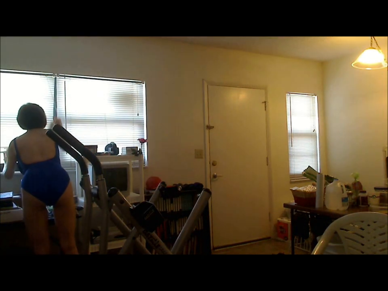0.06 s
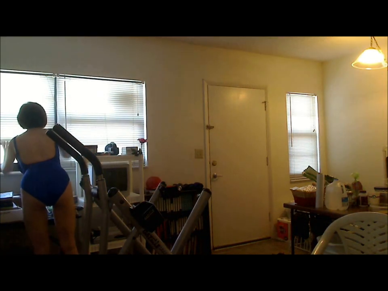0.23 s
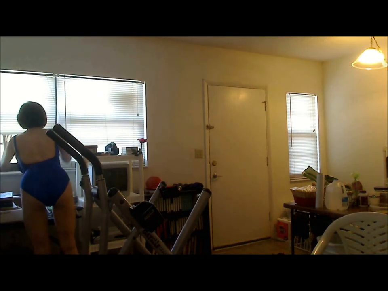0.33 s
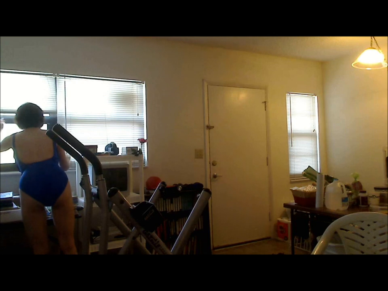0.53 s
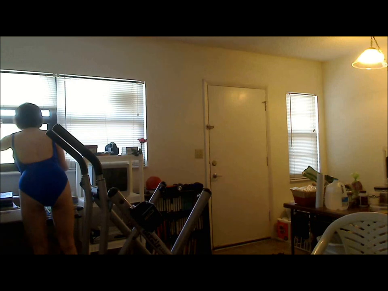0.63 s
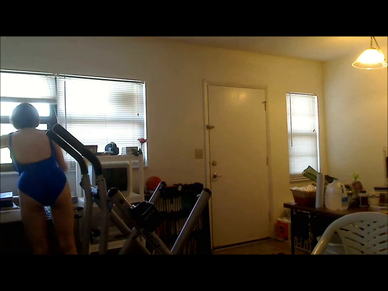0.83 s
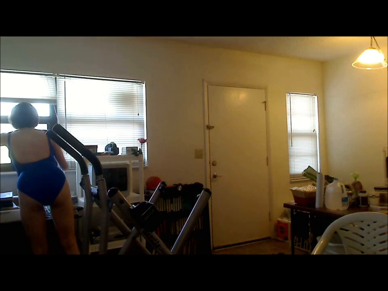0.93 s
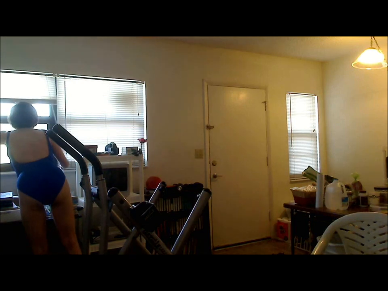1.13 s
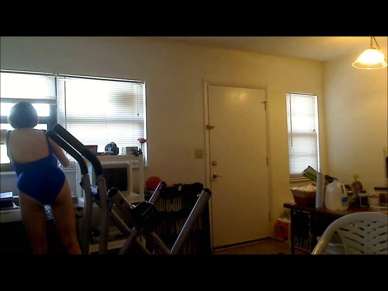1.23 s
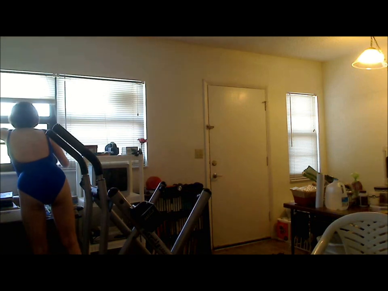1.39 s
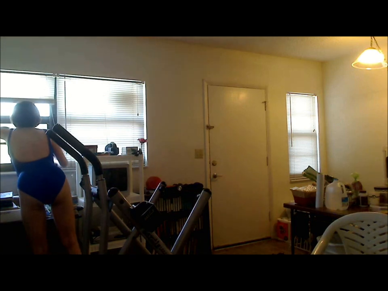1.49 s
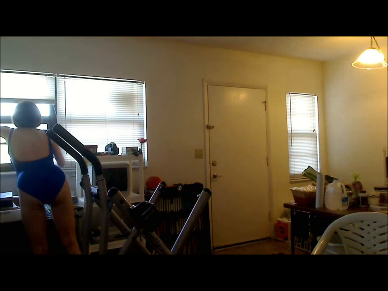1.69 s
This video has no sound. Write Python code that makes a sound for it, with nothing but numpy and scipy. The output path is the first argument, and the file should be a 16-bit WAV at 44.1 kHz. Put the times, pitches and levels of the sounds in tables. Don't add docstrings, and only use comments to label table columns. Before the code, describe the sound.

A horizontal blind rises in one quick pull, dry raspy clatter swelling and thinning, followed by soft hand brushing and sparse slat ticks over very faint hum; short room echo, modest camera microphone with dulled top treble.

```python
import sys
import numpy as np
from scipy import signal
from scipy.fft import rfft, irfft, next_fast_len
from scipy.io import wavfile
from scipy.ndimage import uniform_filter1d, map_coordinates

SR = 44100
rng = np.random.default_rng(int(sys.argv[2]) if len(sys.argv) > 2 else 0)


def gain_from_db(level_db):
    decades = np.asarray(level_db, float) / 20
    return 10 ** decades


def dump(signal):
    limited = np.clip(np.atleast_2d(signal).T, -1, 1)
    pcm = np.round(limited * 32767).astype(np.int16)
    wavfile.write(sys.argv[1], SR, pcm)


N = 77175
T = np.arange(N) / SR

# (multiple of the fundamental, level [dB rms])
HUM_LINES = [(1, -73), (2, -80), (3, -73.5), (4, -90)]
# (frequency [Hz], density [dB per Hz])
AIR_SPECTRUM = [(20, -5.5), (120, 13.5), (250, 5), (330, 6), (600, 0), (1400, -10.5), (5000, -14.5),
                (15700, -20.5)]
# (time [s], level [dB])
HAND_STROKES = [
    [(0, -81.5), (.04, -66.5), (.055, -62.5), (.11, -58.5), (.14, -56), (.2, -60), (.26, -84.5)],
    [(.76, -87), (.84, -56), (.885, -62.5), (.926, -70), (.93, -57.5), (.968, -59), (.978, -95),
     (1.01, -103), (1.04, -92.5)],
]
# (frequency [Hz], density [dB per Hz])
HAND_SPECTRA = [
    [(700, -32), (1100, -16.5), (2300, -3), (3300, 1), (4100, -10), (6000, -15), (7800, -39.5),
     (11500, -19), (15700, -39)],
    [(700, -30.5), (1100, 2.5), (2800, 3), (7000, -12), (8000, -27), (15700, -42)],
]
# (time [s], level [dB], ring pitch [Hz], crack [dB], rattle [s])
SLAT_TICKS = [(.003, -81.5, 9500, -6, 0.012), (.02, -75, 4900, -21, 0.022), (.972, -71.5, 1490, -25, 0.015),
              (1.123, -72.5, 3690, 0, 0.012), (1.125, -76.5, 2770, -10, 0.029),
              (1.123, -76, 1280, -17, 0.038), (1.148, -71.5, 1995, -34, 0.016),
              (1.18, -83.5, 2420, -11, 0.035), (1.208, -85, 1440, 1, .01), (1.235, -88.5, 2167, -2, 0.051),
              (1.395, -90.5, 9500, 2, .015), (1.507, -77.5, 4800, 3, 0.017),
              (1.507, -91.5, 2220, -25, 0.021), (1.564, -79.5, 2267, -4, 0.006),
              (1.571, -80, 2710, -10.5, 0.0077), (1.579, -81, 3206, -8.5, 0.013),
              (1.587, -89, 4500, 0.5, .012), (1.594, -83, 1640, -10, 0.017)]
# (frequency [Hz], density [dB per Hz])
CRACK_SPECTRUM = [(1500, -17), (3390, -10), (6430, -8.5), (10500, -6.5), (13000, -10.5), (15700, -21.5)]
# (frequency [Hz], decay by 60 dB [s])
ROOM_T60 = [(300, 0.26), (2000, 0.18), (10000, 0.21)]
# (time [s], level [dB], strongest pitch [Hz], free ringing [s])
RAIL_KNOCKS = [(0.046, -57, 240, 0.067), (.14, -62, 402, 0.045), (.141, -54, 720, 0.006),
               (.175, -56, 420, 0.063), (.24, -58, 970, 0.055), (0.318, -47.5, 1120, 0.0088),
               (.316, -45, 1390, 0.0066), (.317, -42.5, 566, 0.0074), (.355, -50, 419, .05),
               (.424, -52, 950, 0.0098), (0.701, -53, 950, 0.0051), (.292, -46.5, 420, 0.075),
               (.445, -56.5, 428, 0.031), (0.518, -43, 626, 0.0061), (.546, -43, 623, 0.0043),
               (.577, -45.5, 614, 0.0096), (.662, -47.5, 640, 0.0081), (.696, -47, 616, 0.0049),
               (.752, -49, 596, 0.082), (.927, -51.5, 581, 0.031), (.961, -53.5, 608, 0.011),
               (.976, -60.5, 584, 0.031), (1.126, -64, 651, 0.052), (1.14, -61.5, 230, 0.021),
               (1.17, -68.5, 300, .02), (1.58, -82.5, 660, .05), (1.633, -65, 350, 0.028),
               (1.659, -71, 301, 0.03)]
# (frequency [Hz], level [dB])
RAIL_MODES = [(240, -4), (300, -5.5), (370, -7.5), (412, -1.5), (505, 0.5), (555, -6.5), (595, -4.5),
              (630, 0), (670, -5), (720, -7), (780, 3.5), (960, 2), (1140, 6.5), (1350, 4)]
# (time [s], rasp level [dB], treble [dB])
CORD_PULL = [(0, -92, 0), (0.109, -67, 6), (0.137, -50.5, 5.5), (.16, -52, 2), (0.233, -49.5, 0),
             (0.249, -44.5, 4.5), (0.3, -41.5, 2.5), (0.321, -37, 0.5), (.42, -39.5, 2), (.55, -39, 2.5),
             (.69, -42.5, 0), (.74, -44, -0.5), (.82, -47.5, -1), (0.879, -54, -1), (0.913, -62, -9),
             (.926, -66, -16), (0.966, -85, -23), (.985, -99, -24)]
# (frequency [Hz], density [dB per Hz])
RASP_SPECTRUM = [(260, -51.5), (330, -20.5), (410, -5.5), (1370, -7), (4000, -3.5), (6200, -6.5),
                 (7000, -9), (12500, -14.5), (15700, -24.5)]
# (frequency [Hz], width [Hz], level [dB])
SLAT_MODES = [(985, 100, -3), (1928, 460, -8), (5353, 1000, -4), (9500, 1200, -11), (12220, 900, -12.5)]
# (time [s], level [dB], rattle [s], brightness [dB], rise [s])
SLAT_CLAPS = [(0.1266, -49.5, 0.0062, 8, .001), (0.1436, -35.5, 0.0081, 1.5, 0.0012),
              (0.176, -43.5, 0.0022, 0, 0.0012), (0.2183, -37, 0.0043, 1, 0.0023),
              (0.2445, -29.5, 0.0073, -1, .001), (0.2634, -27.5, 0.0023, -3, .001),
              (0.2764, -29, 0.008, -4.5, .001), (0.306, -30, 0.0062, -5.5, 0.0023),
              (0.3496, -26, 0.0025, 2.5, 0.0013), (0.376, -22.5, 0.0053, 2.5, 0.00087),
              (0.387, -28, .002, 0, 0.00046), (0.4222, -30, .002, 3, .0006),
              (0.4258, -18.5, 0.0044, 0, 0.00081), (0.4439, -27, 0.0069, 2.5, .0015),
              (0.467, -18, 0.0027, 4.5, 0.0005), (0.469, -27, .005, 0.5, .001),
              (0.489, -25, 0.013, 1, 0.0039), (0.5175, -26.5, .002, 3, 0.00055),
              (0.5193, -20, 0.0056, 3, .001), (0.530, -30.5, 0.0065, -2.5, 0.0016),
              (0.5463, -21, 0.0059, 4, 0.00045), (0.5753, -25, 0.0016, 8, .0005),
              (0.578, -22, 0.005, -4, 0.0021), (0.6036, -27.5, 0.013, -1, 0.0012),
              (0.636, -24.5, 0.0051, -6, .001), (0.663, -27.5, 0.0068, -6, 0.0018),
              (0.6958, -22, 0.0073, 0.5, 0.0015), (0.707, -32, 0.0041, -2.5, 0.0011),
              (0.7197, -29, 0.0076, -1.5, 0.0022), (0.7397, -31, 0.0024, -1.5, .001),
              (0.7676, -33.5, 0.006, -1, .001), (0.8097, -37.5, 0.0037, -2, .001),
              (0.853, -43.5, 0.0056, -1, 0.0011), (.932, -51, .006, -30, .001),
              (.949, -53, .004, -30, .001), (.963, -53, 0.0047, -30, .001)]
# (frequency [Hz], density [dB per Hz])
STACK_SPECTRUM = [(260, -50.5), (500, -13), (1390, -9), (3800, -2.5), (5000, 1.5), (6200, 0.5), (7200, -10),
                  (12300, -8), (15700, -19.5)]
# (frequency [Hz], density [dB per Hz])
SWAY_SPECTRUM = [(300, -42), (600, 0.5), (1200, 2), (3000, -1.5), (6000, -5.5), (15700, -18)]

HUM_HZ, THROB_DB = 58.5, 2.5
HUM_DUCK_DB = 6.5
WHINE_HZ, WHINE_DB, WHINE_PER_S = 1830, -98, 14.9
AIR_DB, ROOM_DB = -80.5, -14
TICK_RISE_S, TICK_T60_S = 0.00028, 0.075
TICK_SHARPNESS = 2.5
SNAP_S = 0.00095
RAIL_T60_S, DAMPED_T60_S = 0.34, 0.052
REACH_OCTAVES, SETTLE_S = 0.2, 0.08
BUZZ_DB, BUZZ_PER_S = 2.5, 90
GRAINS_PER_S, GRAIN_SPREAD_DB, SMOOTH_SHARE = 3000, 2, 0.86
THINS_FROM_S, THINS_DB_PER_S, BODY_HZ = 0.49, 68, 790
CLAP_DB, CLAP_T60_S, RATTLE_PER_S = -11, 0.015, 4000
SWAY_DB, SWAY_FROM_S, SWAY_T60_S = -75.5, 0.78, 2.73
TOP_HZ = 15850


def unit(x):
    return x / np.sqrt(np.mean(x ** 2) + 1e-20)


def along(points, hz):
    f, v = np.transpose(points)
    return np.interp(np.log(hz + 1), np.log(f + 1), v)


def filtered(x, response):
    m = next_fast_len(len(x) + 8192)
    return irfft(rfft(x, m) * response(np.fft.rfftfreq(m, 1 / SR)), m)[:len(x)]


def coloured(x, spectrum):
    return unit(filtered(x, lambda hz: gain_from_db(along(spectrum, hz))))


def peak(f, hz, width):
    return 1j * f * width / (hz * hz - f * f + 1j * f * width + 1e-9)


def wobble(rate, size=N):
    knots = rng.standard_normal(int(size * rate / SR) + 4)
    return map_coordinates(knots, [T[:size] * rate])


def grit(per_s, spread_db, smooth, size):
    chance, sign, strength = rng.random((3, size))
    hits = (chance < per_s / SR) * np.sign(sign - 0.5) * gain_from_db(-spread_db * np.log(strength + 0.012))
    smooth = np.clip(smooth, 0, 1)
    return np.sqrt(1 - smooth) * unit(hits) + np.sqrt(smooth) * rng.standard_normal(size)


def patches(x, patchy_db):
    z = signal.stft(x, nperseg=256)[2]
    field = uniform_filter1d(rng.standard_normal(z.shape), 5, 0)
    field = uniform_filter1d(field, 5, 1)
    return signal.istft(z * gain_from_db(patchy_db * unit(field)), nperseg=256)[1][:len(x)]


def burst(rise_s, hold_s, t60, t):
    rise = 1 - np.exp(-t / rise_s)
    snap = 1 + np.exp(-t / SNAP_S)
    return rise * snap * gain_from_db(-60 * np.maximum(t - hold_s, 0) / t60)


def background():
    pulse = 2 * np.pi * WHINE_PER_S * T
    rasp_on = np.interp(T, [0.2, 0.35, 0.7, 0.8], [0, 1, 1, 0])
    second_db = THROB_DB * np.sin(pulse + 1.7) - HUM_DUCK_DB * rasp_on
    hum = np.zeros(N)
    for k, db in HUM_LINES:
        level_db = db + 0.5 * k * wobble(30) + (k == 2) * second_db
        hum += np.sqrt(2) * gain_from_db(level_db) * np.sin(2 * np.pi * k * HUM_HZ * T + 1.5 * k * k)
    whine_db = WHINE_DB + 5.5 * np.tanh(3 * np.sin(pulse + 2.26) + 1.9)
    whine = np.sqrt(2) * gain_from_db(whine_db) * np.sin(2 * np.pi * WHINE_HZ * T)
    return hum + whine + gain_from_db(AIR_DB) * coloured(rng.standard_normal(N), AIR_SPECTRUM)


def hand():
    out = np.zeros(N)
    for stroke, spectrum in zip(HAND_STROKES, HAND_SPECTRA):
        brush = patches(coloured(grit(2200, 1.4, 0.92, size=N), spectrum), patchy_db=2.5)
        s, db = np.transpose(stroke)
        out += brush * gain_from_db(1.6 * wobble(50) + np.interp(T, s, db, left=-120, right=-120))
    return out


def ticks():
    out, t = np.zeros(N + SR), T[:SR // 6]
    for s, db, hz, crack_db, hold_s in SLAT_TICKS:
        contact = grit(1300, 4.5, 0.58, size=len(t))
        width = min(hz, 2300) / TICK_SHARPNESS
        ring = unit(filtered(contact, lambda f: peak(f, hz, width) ** 2))
        x = ring + gain_from_db(crack_db) * coloured(contact, CRACK_SPECTRUM)
        out[round(s * SR):][:len(t)] += gain_from_db(db) * x * burst(TICK_RISE_S, hold_s, TICK_T60_S, t)
    return out[:N]


def room(x):
    hz, t, z = signal.stft(rng.standard_normal(SR // 3), SR, nperseg=256)
    decay = gain_from_db(-60 * t / along(ROOM_T60, hz)[:, None])
    tail = signal.istft(z * decay, SR, nperseg=256)[1]
    return signal.fftconvolve(np.pad(x, (200, 0)), tail / np.linalg.norm(tail))[:N]


def rail():
    out, t = np.zeros(N + SR), T[:SR // 4]
    hz, level = np.transpose(RAIL_MODES)[:, :, None]
    for s, db, centre_hz, ring_s in RAIL_KNOCKS:
        octaves = np.log2(hz / centre_hz)
        near_db = -6 * (octaves / REACH_OCTAVES * (1 + (ring_s / SETTLE_S) ** 2)) ** 2
        fade_db = -60 * t / RAIL_T60_S - 60 * np.maximum(t - ring_s, 0) / DAMPED_T60_S
        buzz_db = BUZZ_DB * np.array([wobble(BUZZ_PER_S, size=len(t)) for mode in RAIL_MODES])
        pitch = hz * (1 + 0.015 * rng.standard_normal(hz.shape))
        phase = 1.5 * rng.random(hz.shape)
        modes = gain_from_db(db + level + near_db + buzz_db + fade_db) * np.sin(2 * np.pi * pitch * t + phase)
        out[round(s * SR):][:len(t)] += modes.sum(0) * (1 - np.exp(-(t / 0.0017) ** 2))
    return out[:N]


def cord():
    s, db, treble_db = np.transpose(CORD_PULL)
    x = grit(GRAINS_PER_S, GRAIN_SPREAD_DB, SMOOTH_SHARE, size=N)
    x = filtered(x, lambda f: 0.7 + sum(gain_from_db(g) * peak(f, c, w) for c, w, g in SLAT_MODES))
    x = unit(patches(coloured(x, RASP_SPECTRUM), patchy_db=2))
    high = filtered(x, lambda f: f > 7000)
    low = filtered(x, lambda f: 1 / (1 + (f / BODY_HZ) ** 6))
    high_gain = gain_from_db(np.interp(T, s, treble_db))
    low_gain = gain_from_db(-THINS_DB_PER_S * np.maximum(T - THINS_FROM_S, 0))
    x = x + (high_gain - 1) * high + (low_gain - 1) * low
    return x * gain_from_db(np.interp(T, s, db, right=-120) + 0.8 * wobble(60))


def claps():
    out, t = np.zeros(N + SR), T[:SR // 8]
    for s, db, hold_s, bright_db, rise_s in SLAT_CLAPS:
        contacts = grit(RATTLE_PER_S, 3.0, 0.5, size=len(t))
        x = patches(coloured(contacts, STACK_SPECTRUM), patchy_db=1.0)
        x = x + (gain_from_db(bright_db) - 1) * filtered(x, lambda f: f > 7500)
        x = x / np.std(x[:round(hold_s * SR) + 100])
        out[round(s * SR):][:len(t)] += gain_from_db(db + CLAP_DB) * x * burst(rise_s, hold_s, CLAP_T60_S, t)
    return out[:N]


def sway():
    rustle = patches(coloured(grit(1200, 3, 0.73, size=N), SWAY_SPECTRUM), patchy_db=3.0)
    fade_db = -60 * np.maximum(T - SWAY_FROM_S, 0) / SWAY_T60_S
    return gain_from_db(SWAY_DB + fade_db) * (T > 0.5) * rustle


def scene():
    blind = hand() + ticks() + cord() + claps() + sway()
    return (background() + blind + gain_from_db(ROOM_DB) * room(blind) + rail())[None]


def roll_off(x):
    return signal.sosfilt(signal.butter(12, 15880, fs=SR, output="sos"), x)


def record(dry):
    mix = filtered(dry[0], lambda hz: hz < TOP_HZ)[None]
    return roll_off(mix)


dry = scene()
out = record(dry)
dump(out)
```